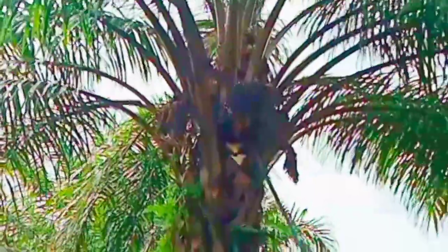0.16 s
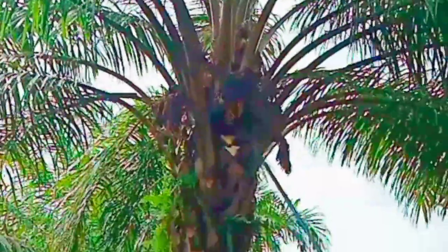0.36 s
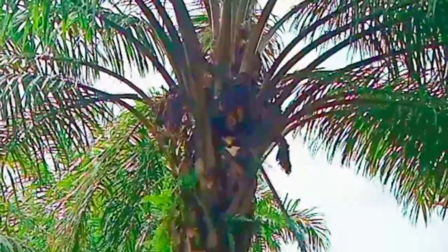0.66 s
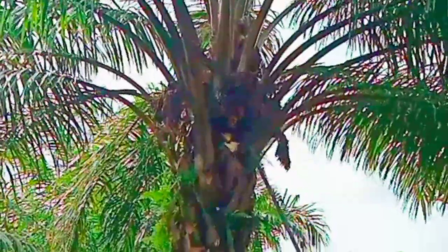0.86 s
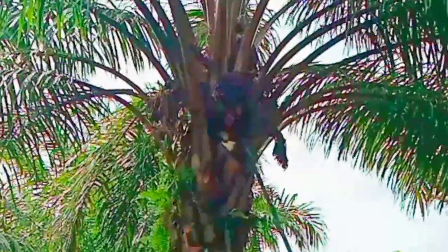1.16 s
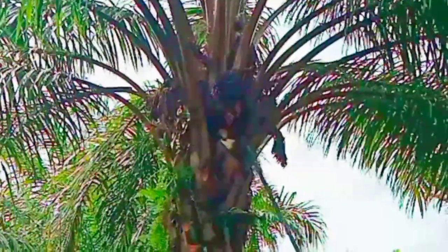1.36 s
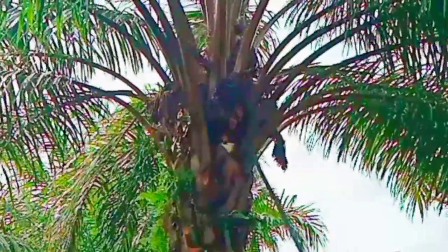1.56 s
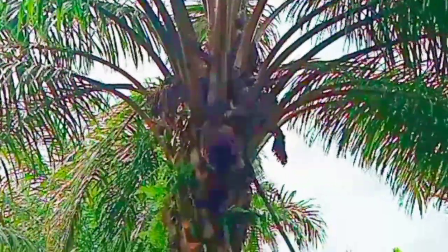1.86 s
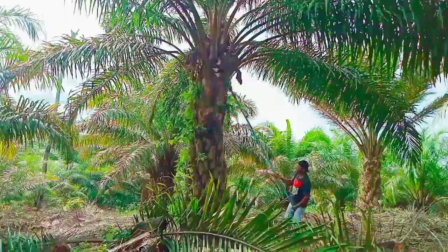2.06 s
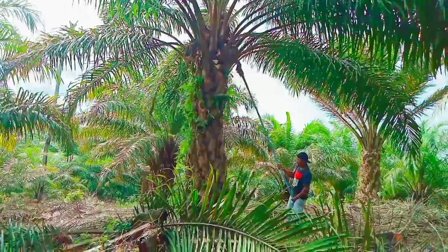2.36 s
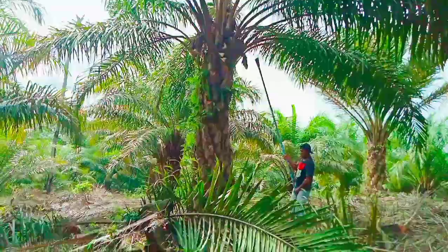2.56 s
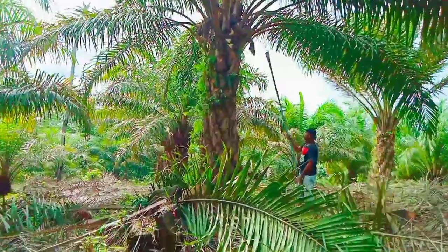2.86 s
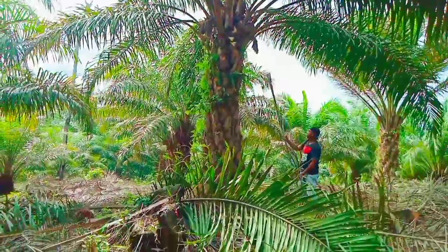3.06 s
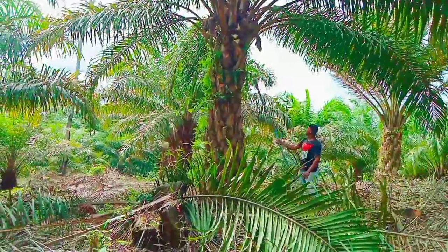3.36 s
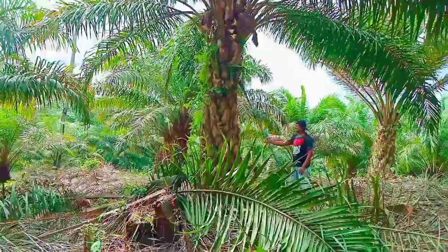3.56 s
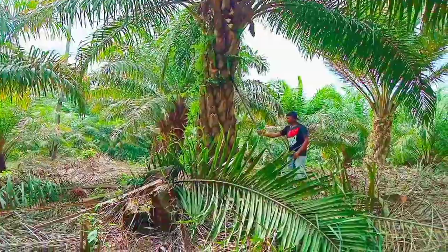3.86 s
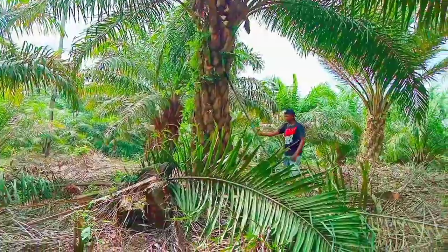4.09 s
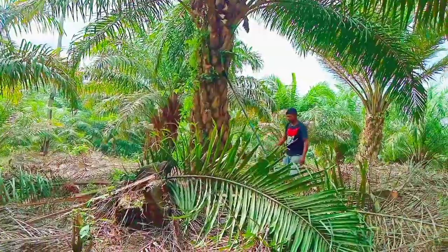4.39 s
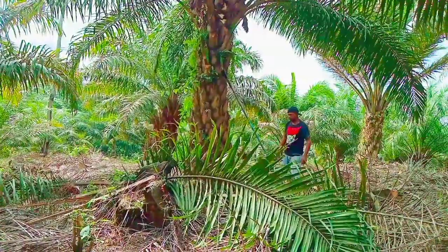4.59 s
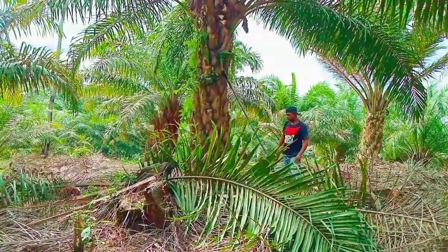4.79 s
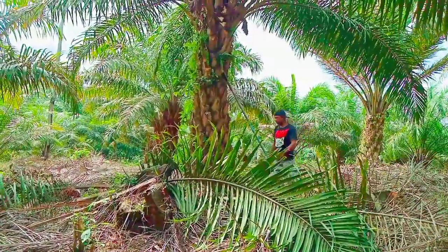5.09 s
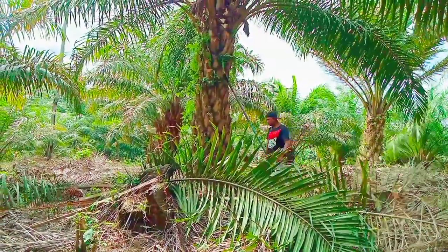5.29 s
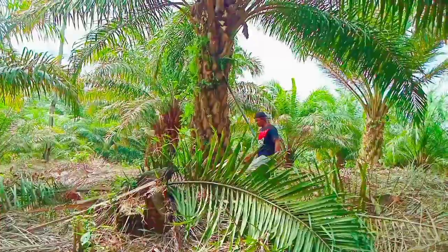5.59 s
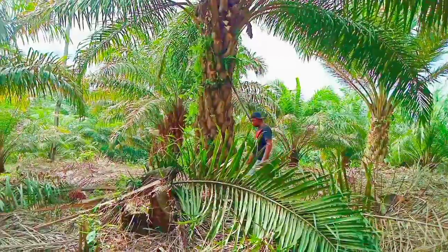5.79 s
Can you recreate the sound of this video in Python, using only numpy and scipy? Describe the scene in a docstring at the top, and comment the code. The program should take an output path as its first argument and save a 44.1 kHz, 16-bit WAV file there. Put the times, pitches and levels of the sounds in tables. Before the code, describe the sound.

Soft leafy rustling and pole scrapes over a steady cicada whine, then a frond crashes down with a crack and thump, followed by scattered snaps.

```python
"""An oil palm grove at harvest: a sickle on a long hollow pole scrapes at the crown and fibres snap.
A cut frond lands with a thump and a crash of leaflets; the pole is lowered, knocking, and litter cracks underfoot.
Grains and noise make the rustle, splinter bursts and falling twangs the snaps, damped sines the knocks and thump.
A delay loop rings the pole; pulsed tones and hiss make the cicadas, over filtered-noise air and low rumble,
with a few gliding bird notes."""
import sys
import numpy as np
from scipy import signal
from scipy.fft import rfft, irfft
from scipy.io import wavfile

SR = 44100
rng = np.random.default_rng(int(sys.argv[2]) if len(sys.argv) > 2 else 0)


def store_pcm(level_fs):
    """Save levels as 16-bit WAV."""
    pcm = np.round(np.clip(level_fs, -1, 1) * 32767).astype(np.int16)
    wavfile.write(sys.argv[1], SR, np.atleast_2d(pcm).T)


N = 261954
TIME = np.arange(N) / SR

# Background levels over time: time_s, air_db, rumble_db, cicada_db
BACKGROUND_LEVELS = [(0, -61, -68.5, -51.5), (.9, -64.5, -71, -52), (1.5, -60.5, -71, -51.5),
                     (2.2, -74, -77.5, -55), (3.4, -64.5, -68, -52), (4.3, -65.5, -67.5, -56),
                     (5.1, -63, -63, -52), (5.5, -64.5, -64, -56.5), (5.94, -63, -61.5, -53)]
# Colour of distant air and rumble, relative: frequency_hz, level_db
AIR_COLOUR = [(25, -20.5), (45, -11), (75, 2), (120, -1.5), (180, -11.5), (400, -13.5), (1000, -18.5),
              (2400, -19.5), (3500, -23.5), (4700, -39), (9000, -38), (12500, -47), (15500, -20)]
# Colour of the far cicada chorus, relative: frequency_hz, level_db
CHORUS_COLOUR = [(4700, -50), (5300, -25), (5850, -14), (6300, -22), (6850, -7), (7250, -3.5), (7650, -1.5),
                 (8100, -9.5), (8700, -27.5), (10000, -34.5), (13000, -35), (14700, -21.5), (15500, -27.5)]
# Nearest cicadas: click_rate_per_s, pitch_hz, relative_level_db
NEAR_CICADAS = [(118.6, 7340, 0), (89.0, 7430, -1)]
# Faint far bird notes: start_s, level_db, start_pitch_hz, end_pitch_hz, length_s
BIRD_NOTES = [(0.247, -58, 2250, 2200, .1), (3.909, -55, 2400, 1800, 0.04), (4.523, -54, 1885, 1900, 0.048)]

# Foliage and litter stirring between the sweeps: time_s, crackle_db
STIR_LEVELS = [(0, -60), (.25, -67), (.75, -61), (1.1, -69), (1.4, -62.5), (2.2, -88.5), (3.52, -56),
               (3.75, -68.5), (4.3, -69.5), (4.7, -62.5), (5.25, -65), (5.45, -73.5), (5.94, -73.5)]
# Fronds brushing past each other: peak_s, crackle_db, stalk_re_crackle_db, hiss_re_crackle_db, rise_s, fall_s
FROND_SWEEPS = [(0.371, -53, -4.5, -3.5, 0.058, 0.16), (0.51, -58, 0, -6, 0.23, 0.093),
                (0.855, -55.5, -2.5, -9, 0.2, 0.25), (1.38, -56, -0.5, 1.5, 0.049, 0.12),
                (1.63, -51.5, -7.5, -12, 0.055, 0.58), (1.82, -52.5, 1.5, -5, 0.27, 0.33),
                (1.89, -45.5, -20, 1, 0.13, 0.095), (2.305, -46.5, -4, -8, 0.015, 0.23),
                (2.389, -38, -3, -6, 0.082, 0.091), (2.73, -34, -13.5, -2, 0.12, 0.15),
                (2.97, -36.5, -1, -32, 0.031, 0.12), (3.204, -32, -14.5, -5, 0.069, 0.1),
                (3.81, -57.5, 3.5, 4.5, 0.082, 0.19), (4.09, -59, -3.5, -5.5, 0.053, .11),
                (4.92, -53, -1.5, -9, 0.34, 0.38), (5.02, -46, -11, -1, 0.13, 0.12),
                (5.245, -58, -10, -6.5, 0.052, 0.18)]
# Colour of rubbing leaves, relative: frequency_hz, level_db
LEAF_COLOUR = [(100, -7.5), (200, -5), (400, -7.5), (800, -4.5), (1400, -5), (2400, 6), (3300, 6),
               (4200, -6.5), (5100, -20), (6200, -12), (7400, -6), (8600, -8.5), (11000, -17.5),
               (15500, -12.5)]
STIR_STALK_DB, STIR_HISS_DB = -7.5, -10  # relative to the stirring crackle
SWELL_RANGE_DB = 20  # gained over a rise time and lost over a fall time
CLUMP_DB, CLUMPS_PER_S = 1.0, 60  # leaflets catch and let go in bunches

# The frond's butt ploughs into the litter, leaflets slap down after it, then all of it settles
CRASH_S = 2.541
PLOUGH_DB, PLOUGH_RISE_S, PLOUGH_FALL_S = -16.5, 0.016, 0.032
SLAP_DB, SLAP_HISS_DB, SLAP_DELAY_S, SLAP_RISE_S, SLAP_FALL_S = -22.5, -23, 0.053, 0.058, 0.11
SETTLE_DB, SETTLE_STALK_DB, SETTLE_HISS_DB, SETTLE_FALL_S = -26, -39, -30, 0.47

# Share of the scrape that rings inside the pole: time_s, share_0_to_1
POLE_SHARE = [(1.5, 0.27), (1.75, 0.57), (1.9, 0.87), (2.15, 0.73), (2.28, 0.5), (2.55, 0.23)]
POLE_HZ = 166.7  # lowest pitch of the hollow pole

# Dull blows of stalk and pole: start_s, level_db, pitch_hz
BLOWS = [(0.867, -39.5, 328), (1.374, -51, 280), (1.395, -44, 672), (1.453, -51.5, 564), (1.516, -47, 722),
         (1.82, -40.5, 304), (1.865, -31.5, 299), (1.872, -39.5, 607), (2.408, -38.5, 722),
         (2.447, -32.5, 593), (2.536, -20, 207), (2.671, -37, 415), (3.174, -39, 224), (3.763, -32.5, 497),
         (3.772, -36.5, 331), (3.793, -34.5, 248), (3.856, -40.5, 373), (3.89, -38.5, 458),
         (3.917, -44, 333), (4.147, -40.5, 618)]
# Modes of a fibrous stalk: multiple_of_pitch, relative_level_db
STALK_MODES = [(.68, -9), (1, -2), (1.25, -9.5), (1.6, -10.5), (2.1, -9.5)]
KNOCK_T60_S = 0.09  # modes above the blow's pitch die faster in proportion

# Snapping fibres and dry stalks, before filtering: start_s, level_db, treble_re_level_db, splintering_s
SNAP_EVENTS = [(0.491, -43.5, 7.5, 0.041), (0.762, -38.5, -5, 0.035), (0.867, -38.5, 8, 0.046),
               (1.270, -43.5, -4, 0.038), (1.347, -29.5, -5, 0.039), (1.453, -44.5, 1, .03),
               (1.514, -46.5, -14, .025), (1.865, -39.5, -1, 0.022), (2.296, -44.5, 2, 0.023),
               (2.444, -34.5, 6.5, 0.033), (2.533, -11.5, -8, 0.037), (3.172, -20.5, 1.5, 0.029),
               (3.212, -19, 3, 0.025), (3.226, -41.5, 22.5, 0.064), (3.762, -28, 1, 0.027),
               (3.853, -42.5, -11, .03), (3.888, -33.5, 3.5, 0.018), (4.468, -43, -7, 0.045),
               (4.759, -37.5, -9, 0.037), (4.881, -36.5, -5, 0.012), (4.897, -35.5, 4, 0.023),
               (4.964, -32, -2, 0.03), (4.997, -18, 2.5, 0.0076)]
# Colour of a snap, relative: frequency_hz, level_db
SNAP_COLOUR = [(150, -6), (400, -12.5), (800, -9.5), (1300, -0.5), (2300, 5), (3400, 0), (4300, -16.5),
               (5200, -23.5), (6300, -10.5), (7400, -2), (9500, -20.5), (15500, -21.5)]
# Small fibres snap at random moments at a steady average rate, louder when the rustle is louder
TWIGS_PER_S, TWIG_S = 8, .018
TWIG_OVER_RUSTLE_DB, TWIG_SPREAD_DB, TWIG_TOP_DB, TWIG_TREBLE_DB = 10, 3, -40.5, 8
# A broken stalk twangs: level relative to the snap, pitches before a random size factor
RECOIL_DB, RECOIL_START_HZ, RECOIL_END_HZ, RECOIL_FALL_S = -11, 1510, 300, 0.00605
RECOIL_RINGS = 1.22  # ring time as a multiple of the splintering time

# The frond butt hits the soil and rocks back on it: start_s, level_db
BUTT_IMPACTS = [(2.543, 2), (2.554, -4.5)]
# Answer of the ground: frequency_hz, relative_level_db, t60_s
GROUND_MODES = [(59.3, -31.5, 0.35), (88, -28, 0.15), (121.2, -24.5, 0.15), (197, -27.5, 0.18)]

CUTOFF_HZ = 15700  # top of the treble


def from_db(db):
    """Turn decibels into gain."""
    return 10 ** (np.asarray(db) / 20)


def rms_one(x):
    """Scale a sound to rms 1."""
    return x / np.sqrt(np.mean(x ** 2) + 1e-20)


def in_time(rows):
    """Draw each column of a time curve at every sample."""
    times, *columns = np.transpose(rows)
    return [np.interp(TIME, times, column) for column in columns]


def span_of(start_s, length_s):
    """Select the samples that an event covers."""
    return slice(int(start_s * SR), int((start_s + length_s) * SR))


def tone(pitch):
    """Sine whose phase follows a moving pitch in Hz."""
    return np.sin(2 * np.pi * np.cumsum(pitch) / SR)


def cut(x, hz, kind, order=4):
    """Butterworth low- or high-pass."""
    sections = signal.butter(order, min(hz, .45 * SR), kind, fs=SR, output="sos")
    return signal.sosfilt(sections, x + 1e-18)


def band(x, low_hz, high_hz):
    """Keep one band of a sound, at rms 1."""
    return rms_one(cut(cut(x, low_hz, "high"), high_hz, "low"))


def coloured(x, spectrum, size=4096):
    """Minimum-phase filter with the given spectrum shape; white noise keeps its power."""
    hz, db = np.transpose(spectrum)
    grid = np.maximum(np.arange(size // 2 + 1) * SR / size, 1)
    level_db = np.interp(np.log(grid), np.log(hz), db)
    # folding the cepstrum forward makes the response causal
    cepstrum = irfft(np.log(from_db(level_db)))
    cepstrum[1:size // 2] *= 2
    cepstrum[size // 2 + 1:] = 0
    response = irfft(np.exp(rfft(cepstrum)))
    return signal.fftconvolve(x, response / np.linalg.norm(response))[:N]


def drift(rate):
    """Random wander of rms 1, drawn as straight lines between rate points per second."""
    knots = rng.standard_normal(N // 20)
    return rms_one(np.interp(TIME * rate, np.arange(len(knots)), knots))


def dying(start, t60):
    """Envelope that jumps to 1 at start and falls by 60 dB in t60 seconds."""
    age = TIME - start
    return (age >= 0) * np.exp(-np.log(1000) * np.clip(age / t60, 0, 10))


def grains(per_s, spread_db):
    """Random clicks of uneven size and either sign, rms 1."""
    sizes = from_db(spread_db * np.minimum(rng.exponential(1, N), 4))
    happens = rng.random(N) < per_s / SR
    return rms_one(happens * sizes * rng.choice([-1, 1], N))


def swell(peak_s, rise_s, fall_s):
    """Level in dB, 0 at the peak: a steady climb, then a steady fall."""
    age = TIME - peak_s
    return -SWELL_RANGE_DB * np.maximum(-age / rise_s, age / fall_s)


def together(levels_db):
    """Sum the powers of unrelated sounds heard at once, in dB."""
    return 10 * np.log10(sum(from_db(np.maximum(db, -150)) ** 2 for db in levels_db))


def distant_air(air_db, rumble_db):
    """Coloured noise split at 170 Hz, so that air and rumble move in level separately."""
    noise = coloured(rng.standard_normal(N), AIR_COLOUR)
    air = from_db(air_db) * rms_one(cut(noise, 170, "high"))
    rumble = from_db(rumble_db) * rms_one(cut(noise, 170, "low"))
    return air + rumble


def cicadas():
    """Near insects click their tymbals in trains, each click ringing the body; the far chorus blurs into hiss."""
    near = np.zeros(N)
    for per_s, hz, db in NEAR_CICADAS:
        cycle = (per_s * TIME + .012 * drift(17) + rng.random()) % 1
        age = cycle / per_s  # seconds since the latest click
        pulse = (1 - np.exp(-age / .0009)) * np.exp(-age / .002)
        near += from_db(db) * pulse * np.sin(2 * np.pi * hz * age + 1.1 * drift(400))
    chorus = .8 * coloured(rng.standard_normal(N), CHORUS_COLOUR)
    beat_hz = NEAR_CICADAS[0][0] - NEAR_CICADAS[1][0]  # the two click rates beat
    throb = 1 + .2 * np.sin(2 * np.pi * beat_hz * TIME)
    return rms_one(rms_one(near) * throb + chorus)


def birds():
    """Short, slightly wavering whistles that glide, swell and fade."""
    out, waver = np.zeros(N), 1 + 0.01 * drift(200)
    for s, level_db, start_hz, end_hz, length in BIRD_NOTES:
        span = span_of(s, length)
        along = np.linspace(0, 1, len(TIME[span]))
        pitch = (start_hz + (end_hz - start_hz) * along) * waver[span]
        out[span] += from_db(level_db) * np.sin(np.pi * along) * tone(pitch)
    return out


def trunks(x, t60, wet_db):
    """Scattered dull echoes from the surrounding palms, added to the direct sound."""
    echoes = cut(grains(per_s=2100, spread_db=2.0), 9700, "low", order=1) * dying(0.0085, t60)
    echoed = signal.fftconvolve(x, echoes[:SR] / np.linalg.norm(echoes))[:N]
    return x + from_db(wet_db) * echoed


def foliage_levels():
    """Stalk scrape, leaflet crackle and leaflet hiss in dB, from the stirring, the sweeps and the crash."""
    stir, = in_time(STIR_LEVELS)
    stalk, crackle, hiss = [stir + STIR_STALK_DB], [stir], [stir + STIR_HISS_DB]
    for s, level_db, stalk_db, hiss_db, rise_s, fall_s in FROND_SWEEPS:
        sweep = level_db + swell(s, rise_s, fall_s)
        stalk.append(sweep + stalk_db)
        crackle.append(sweep)
        hiss.append(sweep + hiss_db)
    plough = swell(CRASH_S, PLOUGH_RISE_S, PLOUGH_FALL_S)
    slap = swell(CRASH_S + SLAP_DELAY_S, SLAP_RISE_S, SLAP_FALL_S)
    settle = swell(CRASH_S, PLOUGH_RISE_S, SETTLE_FALL_S)
    stalk += [plough + PLOUGH_DB, settle + SETTLE_STALK_DB]
    crackle += [slap + SLAP_DB, settle + SETTLE_DB]
    hiss += [slap + SLAP_HISS_DB, settle + SETTLE_HISS_DB]
    uneven = CLUMP_DB * drift(CLUMPS_PER_S)
    return together(stalk) + uneven, together(crackle) + uneven, together(hiss) + uneven


def rustle(stalk_db, crackle_db, hiss_db):
    """Stalks drag with coarse grains; leaflets slap in clumps and slide with a fine hiss."""
    slaps = grains(per_s=6000, spread_db=1.5) * from_db(2.0 * drift(220))
    ticks = .36 * grains(per_s=260, spread_db=2.0)  # dry tips add sharp single ticks
    slide = 0.45 * rng.standard_normal(N)
    leaves = coloured(slaps + ticks + slide, LEAF_COLOUR)
    midribs = grains(per_s=4300, spread_db=1.5) + 1.9 * ticks
    # midribs lie between stalk and leaflet in size, sheen between crackle and hiss
    rib_db = 0.29 * stalk_db + 0.84 * crackle_db - .8
    sheen_db = (crackle_db + hiss_db) / 2 + 0.18
    out = band(leaves, 179, 1470) * from_db(stalk_db)
    out += band(midribs, 1600, 2310) * from_db(rib_db)
    out += band(leaves, 2220, 4420) * from_db(crackle_db)
    out += band(leaves, 5380, 8630) * from_db(sheen_db)
    out += band(leaves, 9000, 17000) * from_db(hiss_db)
    return out


def pole(scrape, t60):
    """Sound runs up and down the hollow pole, so it rings at multiples of its lowest pitch."""
    lag = round(SR / POLE_HZ)
    gain = from_db(-60 / (POLE_HZ * t60))  # loss per round trip
    out = cut(scrape, 2850, "low", order=2)
    for i in range(lag, N - lag, lag):
        out[i:i + lag] += gain * out[i - lag:i]
    return out * np.sqrt(1 - gain ** 2)


def knocks(sag=0.049, sag_s=0.01, smear=0.087, crush_db=-4, crush_t60=0.03):
    """A dull crush of fibres, then wet stalk modes: high ones die first and the pitch sags as the blow relaxes."""
    out, crush = np.zeros(N), band(rng.standard_normal(N), 170, 1900)
    wobbles = [drift(300) for mode in STALK_MODES]
    for s, level_db, hz in BLOWS:
        span = span_of(s, 2 * KNOCK_T60_S)
        age = TIME[span] - s
        out[span] += crush[span] * from_db(level_db + crush_db - 60 * age / crush_t60)
        sagging = sag * (np.exp(-age / sag_s) - .5)
        for k, (ratio, mode_db) in enumerate(STALK_MODES):
            pitch = hz * ratio * (1 + sagging + smear * wobbles[k][span])
            fade_db = -60 * age / KNOCK_T60_S * max(ratio, 1)
            sign = (-1) ** k  # neighbouring modes start in opposite directions
            out[span] += sign * from_db(level_db + mode_db + fade_db) * tone(pitch)
    return out


def twigs(crackle_db):
    """Small snaps at random moments, their levels following the rustle up to a ceiling."""
    breaking = (rng.random(N) < TWIGS_PER_S / SR) & (TIME < TIME[-1] - 2 * TWIG_S)
    levels = crackle_db + TWIG_OVER_RUSTLE_DB + TWIG_SPREAD_DB * rng.uniform(-0.8, 1, N)
    return [(s, min(db, TWIG_TOP_DB), TWIG_TREBLE_DB, TWIG_S)
            for s, db in zip(TIME[breaking], levels[breaking])]


def snaps(breaks):
    """Each break is a quick run of tearing fibres that dies away."""
    splinters = grains(per_s=9000, spread_db=-1.0) * from_db(4.4 * drift(700))
    body, treble = np.zeros(N), np.zeros(N)
    for s, level_db, treble_db, length in breaks:
        span = span_of(s, 2 * length)
        age = (TIME[span] - s) / length  # in splintering times, so longer tears also build up more slowly
        build_up = 1.16 * (1 - np.exp(-(age + .01) / 0.039))
        envelope = from_db(-60 * age) * build_up
        burst = splinters[span] * envelope
        burst *= np.linalg.norm(envelope) / np.linalg.norm(burst)  # same energy as the envelope
        body[span] += burst * from_db(level_db)
        treble[span] += burst * from_db(level_db + treble_db)
    split = cut(body, 4000, "low") + cut(treble, 4800, "high")
    return from_db(1.5) * coloured(split, SNAP_COLOUR)


def recoil():
    """As the tension leaves a broken stalk, its pitch drops quickly; longer tears ring for longer."""
    out = np.zeros(N)
    sizes = rng.uniform(0.812, 1.2, len(SNAP_EVENTS))
    for (s, level_db, _, length), size in zip(SNAP_EVENTS, sizes):
        t60 = RECOIL_RINGS * length
        span = span_of(s, 2 * t60)
        age = TIME[span] - s
        fall = np.exp(-age / RECOIL_FALL_S)
        pitch = size * (RECOIL_END_HZ + (RECOIL_START_HZ - RECOIL_END_HZ) * fall)
        out[span] += from_db(level_db + RECOIL_DB - 60 * age / t60) * tone(pitch)
    return out


def landing():
    """The heavy butt sets the soft ground thudding, and the frond settles with a low shudder."""
    thud = np.zeros(N)
    for s, level_db in BUTT_IMPACTS:
        for hz, db, t60 in GROUND_MODES:
            thud += from_db(level_db + db) * np.sin(2 * np.pi * hz * (TIME - s)) * dying(s, t60)
    shudder = band(rng.standard_normal(N), 55, 230)
    return thud + from_db(-46.0) * shudder * dying(BUTT_IMPACTS[0][0], t60=1.7)


def scene():
    """Work at the palm, heard through the grove over insects, birds and distant air."""
    air_db, rumble_db, cicada_db = in_time(BACKGROUND_LEVELS)
    background = distant_air(air_db, rumble_db) + from_db(cicada_db) * cicadas() + birds()

    stalk_db, crackle_db, hiss_db = foliage_levels()
    leaves = rustle(stalk_db, crackle_db, hiss_db)
    blows = knocks()
    cracks = snaps(list(SNAP_EVENTS) + twigs(crackle_db)) + recoil()

    share = np.clip(in_time(POLE_SHARE)[0], 0, 1)
    ringing = pole(share * (leaves + .5 * blows), t60=0.16)
    open_leaves = leaves * np.sqrt(1 - share ** 2)
    echoing = trunks(cracks + blows, t60=0.089, wet_db=-15.0)
    work = open_leaves + ringing + echoing + landing()
    return (background + work)[None]


def record(dry):
    """The small microphone loses the deepest bass, and the top is cut steeply."""
    thin = cut(dry, 42, "high", order=6)
    steep = signal.ellip(12, .2, 80, CUTOFF_HZ, fs=SR, output="sos")
    return signal.sosfilt(steep, thin)


dry = scene()
out = record(dry)
store_pcm(out)
```